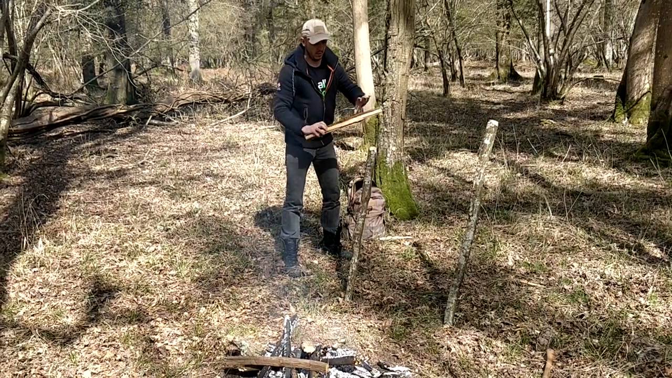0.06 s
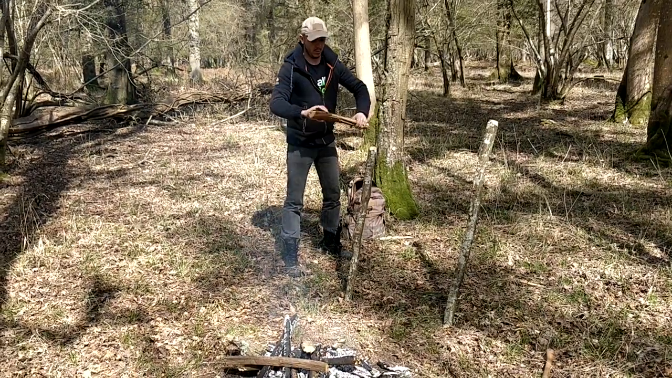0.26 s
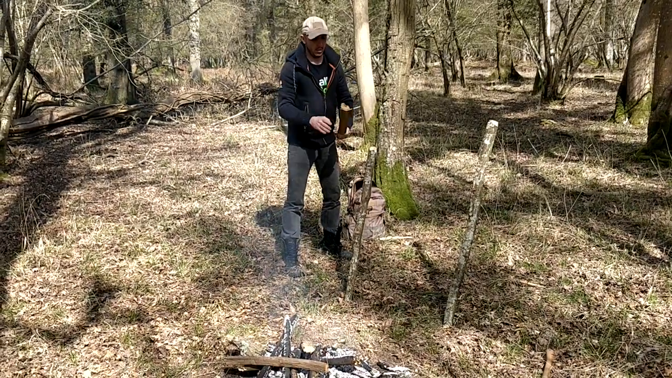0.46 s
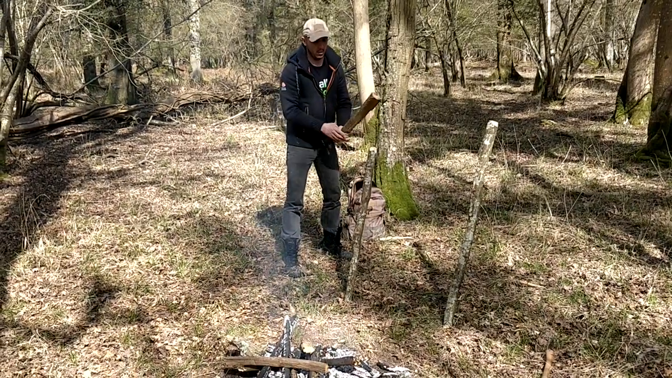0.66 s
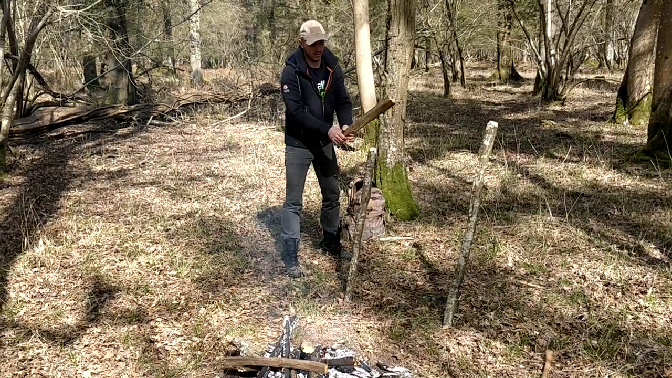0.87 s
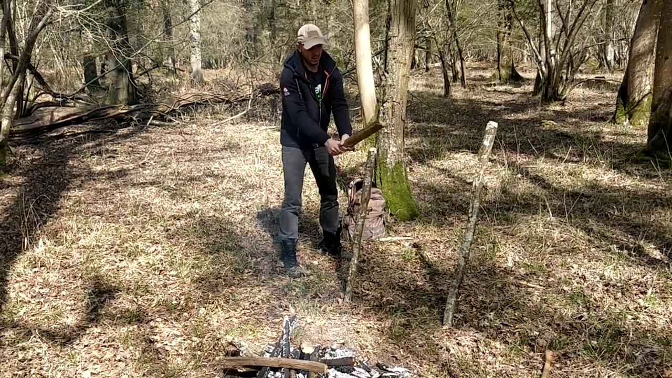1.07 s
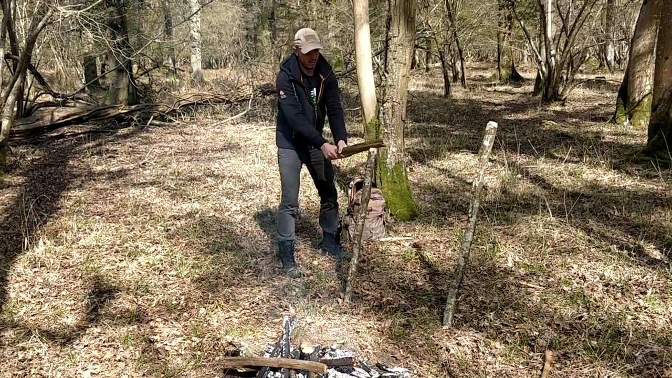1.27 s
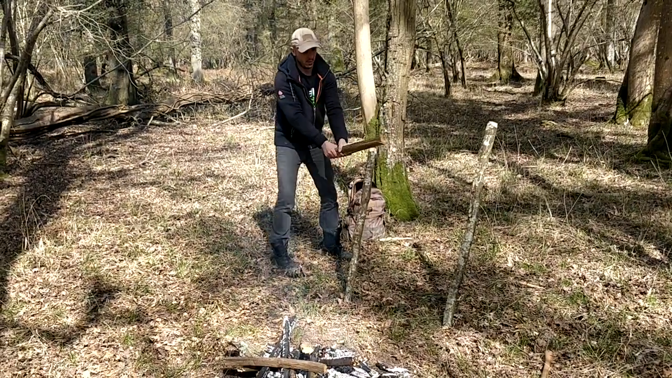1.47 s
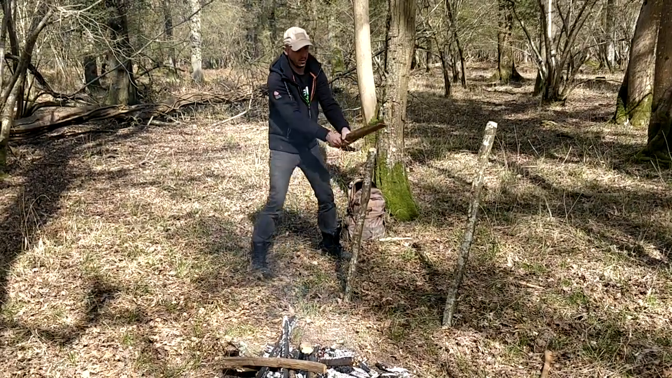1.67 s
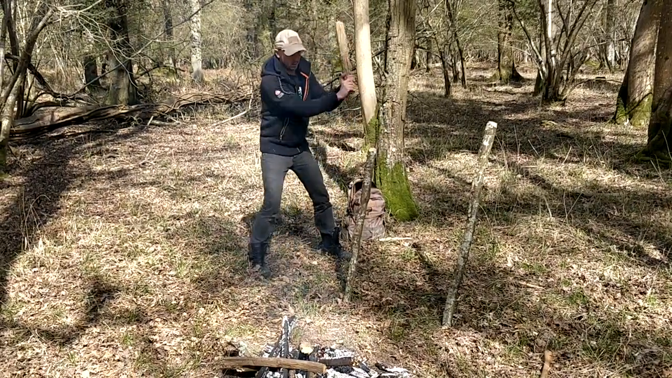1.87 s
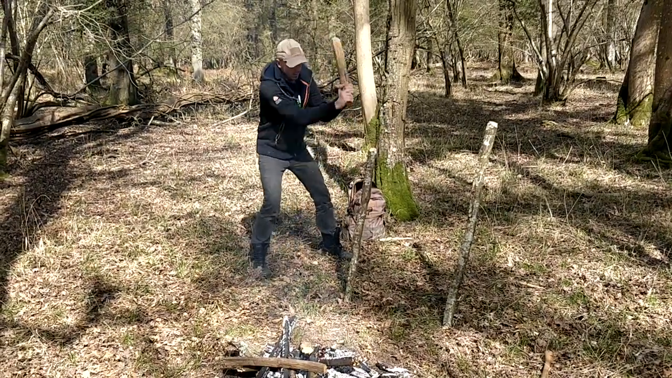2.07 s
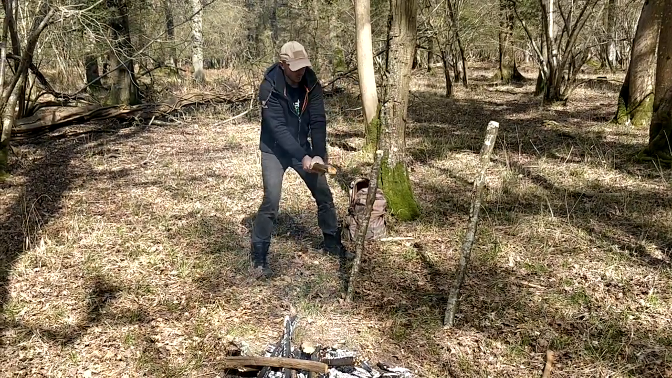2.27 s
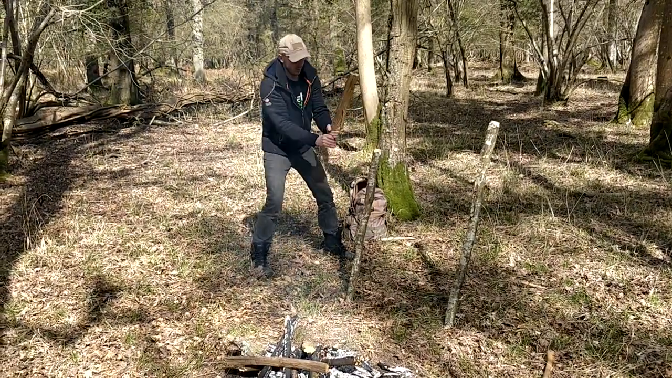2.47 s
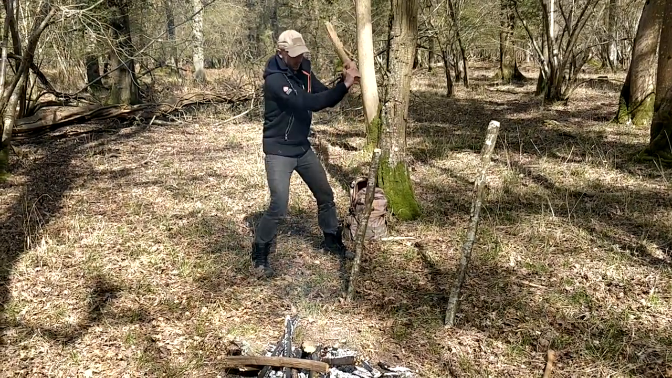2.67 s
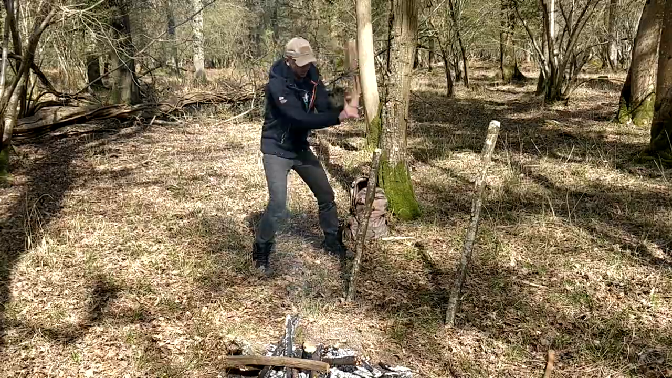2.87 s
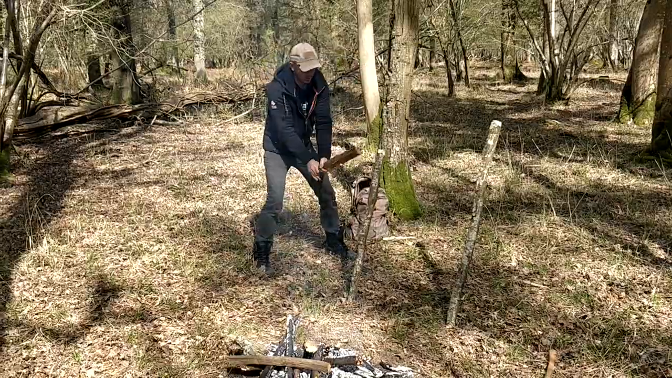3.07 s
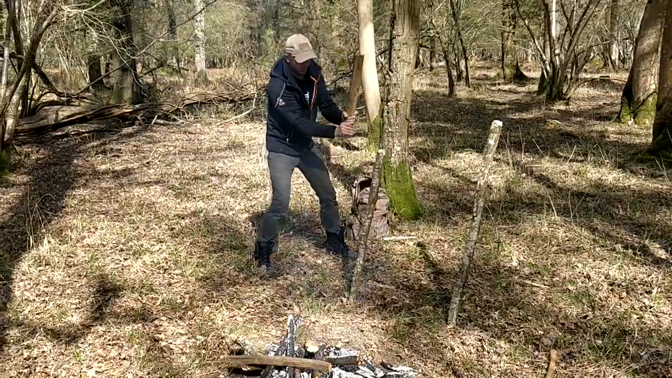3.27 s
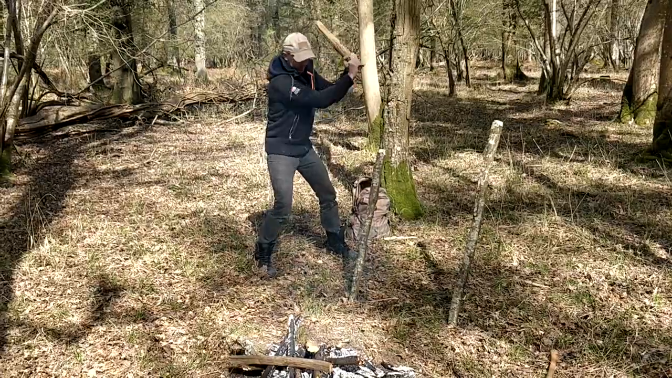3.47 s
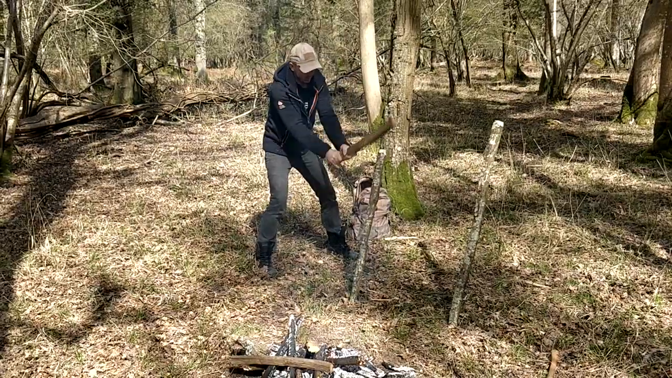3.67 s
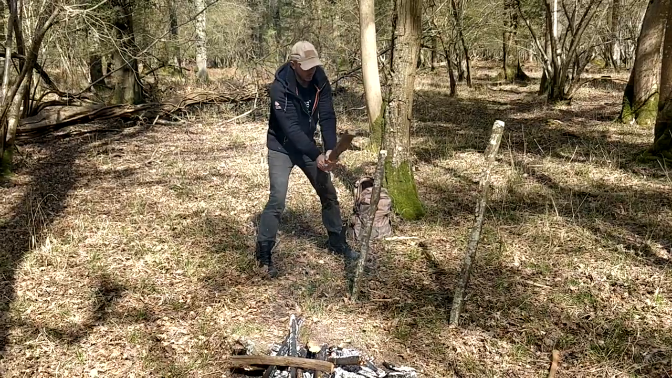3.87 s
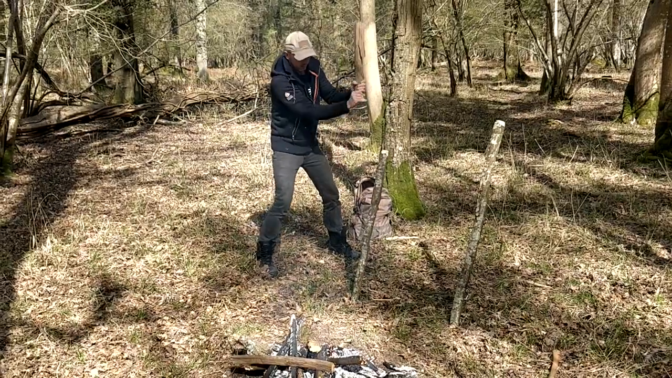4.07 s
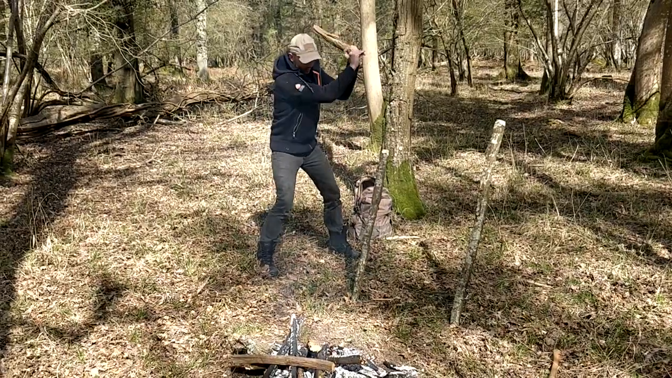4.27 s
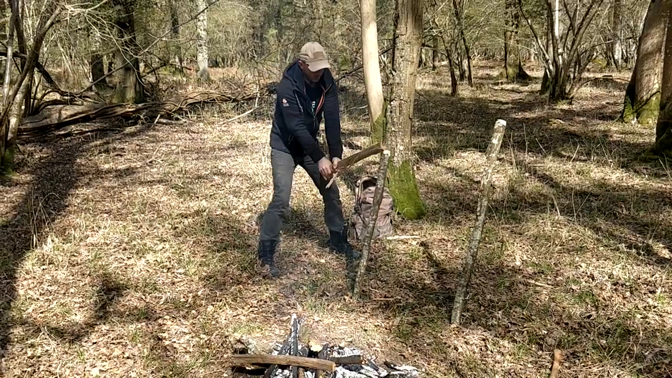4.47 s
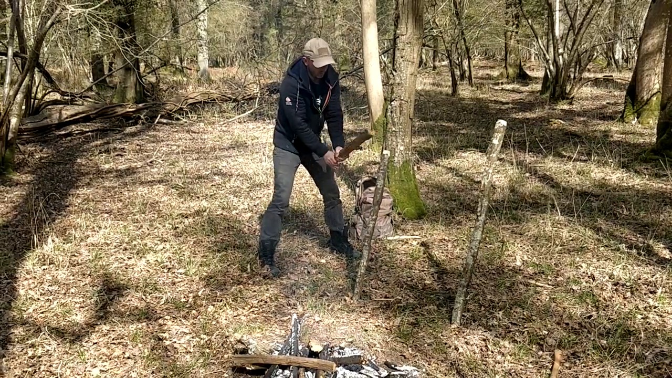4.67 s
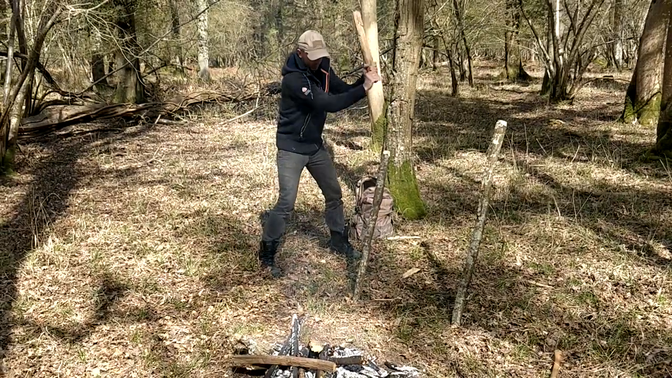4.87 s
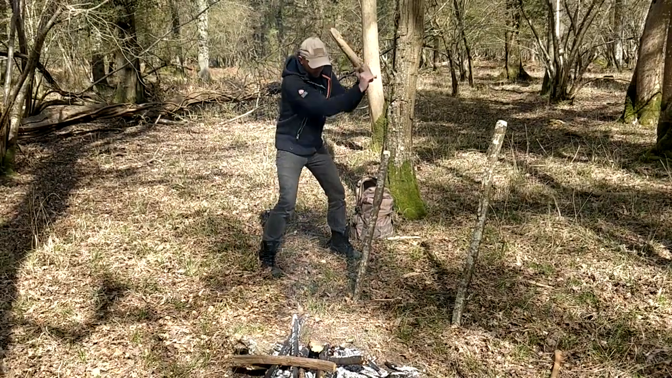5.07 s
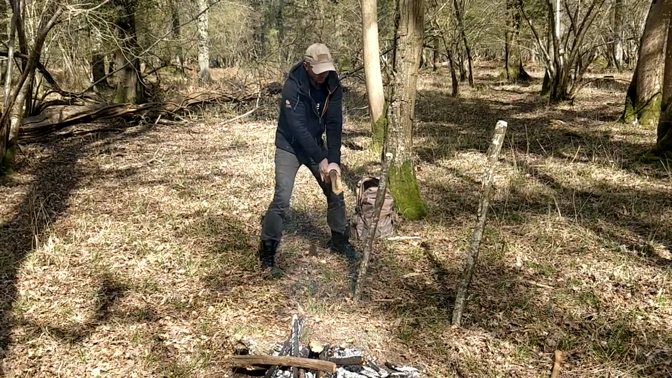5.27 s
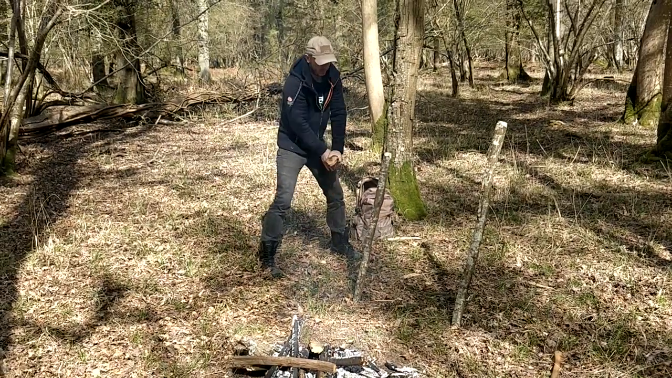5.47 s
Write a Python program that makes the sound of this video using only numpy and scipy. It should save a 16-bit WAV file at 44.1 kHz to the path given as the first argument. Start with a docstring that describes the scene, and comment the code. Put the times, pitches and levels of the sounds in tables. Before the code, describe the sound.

A wooden club drives a stake into woodland ground: one moderate knock, a faint tap, then five hard cracking blows with a short forest echo.

```python
"""Driving a stake in the woods

A wooden club drives a stake into a woodland floor: a trial blow, a light tap, then five full swings.
Each blow is a bank of damped wood modes, bursts of crackling noise and a low push from the soil.
Single trees echo it, and a second of decaying noise stands for the forest's wash.
Shaped noise makes leaves under boots, snapping twigs, breeze and far hush; sines make a chip's whir
and two far bird whistles."""
import sys
import numpy as np
from scipy import signal
from scipy.fft import rfft, irfft, next_fast_len
from scipy.io import wavfile
from scipy.ndimage import uniform_filter1d, minimum_filter1d, map_coordinates

SR = 44100
rng = np.random.default_rng(int(sys.argv[2]) if len(sys.argv) > 2 else 0)


def materialize(psi):
    """Save the field psi as 16-bit PCM at rate SR to the path in sys.argv[1].

    A 1-D psi becomes a single channel; in a 2-D psi each row is a channel.
    """
    bounded = np.clip(np.atleast_2d(psi).T, -1, 1)
    quanta = np.round(bounded * 32767).astype(np.int16)
    wavfile.write(sys.argv[1], SR, quanta)


N = 244049
TIME = np.arange(N) / SR


def amp(db):
    """Decibels to gain."""
    return 10 ** (np.asarray(db) / 20)


def unit(x):
    """Scales x to rms 1."""
    return x / np.sqrt(np.mean(x ** 2) + 1e-20)


def along(points, hz):
    """Reads a curve of (Hz, value) points on a log frequency axis."""
    f, v = np.transpose(points)
    return np.interp(np.log(hz + 1), np.log(f + 1), v)


def wobble(rate, size=N):
    """A smooth random curve with the given number of knots a second."""
    knots = rng.standard_normal(size // 8)
    return map_coordinates(knots, [np.arange(size) * rate / SR], mode="wrap")


def filtered(x, response):
    """Filters x by a response given as a function of frequency."""
    n = x.shape[-1]
    padded = next_fast_len(n + SR // 8)
    spectrum = rfft(x, padded) * response(np.fft.rfftfreq(padded, 1 / SR))
    return irfft(spectrum, padded)[..., :n]


def noise(spectrum, alike=None, size=N):
    """Stereo noise of rms 1: mid and side are balanced to set the left-right likeness by frequency."""
    def colour(hz):
        if alike:
            turn = np.arccos(np.clip(along(alike, hz), -1, 1)) / 2
        else:
            turn = np.full(len(hz), np.pi / 4)  # unrelated sides
        return amp(along(spectrum, hz)) * [np.cos(turn), np.sin(turn)]

    mid, side = filtered(rng.standard_normal((2, size)), colour)
    return unit(np.array([mid + side, mid - side]))


def grainy(x, spread_db):
    """Breaks a hiss into crackles of about a millisecond."""
    return unit(x * amp(spread_db * wobble(900, size=x.shape[-1])))


def add(track, s, x):
    """Mixes x into the track at time s."""
    at = round(s * SR)
    track[:, at:at + x.shape[1]] += x[:, :N - at]


# colour of the distant woodland hush: freq_hz, density_db (relative, per Hz)
HUSH_COLOUR = [(40, -11.5), (100, -18.5), (300, -27), (680, -26.5), (1100, -37), (2200, -42.5), (3700, -42),
               (5500, -48.5), (9000, -54.5), (13000, -53), (16000, -53.5)]
# how alike the hush is in both ears: freq_hz, likeness (-1 to 1)
HUSH_ALIKE = [(50, 0.89), (130, 0.42), (300, 0.95), (640, .3), (1400, -0.34), (3000, 0.3)]


def distant_hush():
    """Steady far woodland noise whose level drifts slowly."""
    return amp(-56.5 + 0.85 * wobble(2.3)) * noise(HUSH_COLOUR, HUSH_ALIKE)


# colour of the wind rumble: freq_hz, density_db (relative, per Hz)
BUFFET_COLOUR = [(12, 1), (30, -4.5), (55, -3), (110, -17), (250, -30.5), (550, -73.5)]
# puffs over the steady breeze: peak_s, level_db, half_length_s (fall by a factor e)
GUSTS = [(0.066, -38.5, 0.15), (0.53, -46.5, 0.28), (1.555, -51, 0.22), (5.17, -47, 0.16)]
BREEZE_DB = -56


def breeze():
    """Moving air buffets the microphone in low lumps, stronger in each puff."""
    rumble = noise(BUFFET_COLOUR, [(25, 0.11), (120, 1.0)])  # freq_hz, likeness
    lumps = unit(amp(2.4 * wobble(9)) * rumble)
    wind = amp(BREEZE_DB)
    for s, db, half in GUSTS:
        wind = wind + amp(db) * np.exp(-((TIME - s) / half) ** 2)
    return wind * lumps


# far bird whistles: peak_s, pitch_hz, level_db
WHISTLES = [(.095, 4000, -76), (.195, 3220, -70)]


def bird():
    """Two faint steady whistles, each a sine that swells and fades."""
    out = np.zeros(N)
    for s, hz, db in WHISTLES:
        swell = np.exp(-((TIME - s) / 0.026) ** 2)
        out += amp(db) * swell * np.sin(2 * np.pi * hz * TIME)
    return out


# colour of dry leaves: freq_hz, density_db (relative, per Hz)
LEAF_COLOUR = [(500, -25), (1200, -10), (2200, -13), (4000, -3), (6500, -5.5), (9000, -18.5), (11500, -2),
               (13800, 1), (16000, -10)]
# boots turning in the leaves: strongest_push_s, level_db
SHUFFLES = [(1.22, -57), (1.68, -42.5), (3.51, -57), (4.92, -58.5)]
SHUFFLE_RISE_S, SHUFFLE_FALL_S = .07, 0.073  # time to swell and to settle by a factor e
STIR_REST_DB, STIR_WORK_DB, WORK_START_S = -73.5, -66.5, 2  # leaves stir more as full swings start


def shuffling():
    """Dry leaves stir faintly all along, and swell and settle each time a boot turns."""
    stir = amp(np.where(TIME < WORK_START_S, STIR_REST_DB, STIR_WORK_DB))
    turns = np.zeros(N)
    for s, db in SHUFFLES:
        distance = np.maximum((s - TIME) / SHUFFLE_RISE_S, (TIME - s) / SHUFFLE_FALL_S)
        turns += amp(db) * np.exp(-distance)
    rustle = grainy(noise(LEAF_COLOUR), spread_db=2.0)
    return np.hypot(stir, turns) * amp(1.1 * wobble(34)) * rustle


# short scrunches of leaf litter and clothing: start_s, level_db, length_s, crisp_top_db (relative)
SCRUNCHES = [(0.291, -56, 0.057, 1), (0.376, -57, 0.03, 8.5), (.599, -52.5, 0.013, -1),
             (2.484, -40, 0.049, 6.5), (3.2, -46, 0.033, -4), (4.005, -40.5, .018, 14),
             (4.348, -48.5, 0.048, -0.5), (4.697, -48.5, .033, 2.5), (4.782, -42, 0.047, 5.5),
             (5.304, -42.5, 0.026, 2)]
# dry twigs snapping: start_s, level_db
SNAPS = [(.9735, -51), (.984, -53), (1.938, -50), (2.489, -35), (3.211, -33), (4.004, -38), (4.804, -39)]
# colour of twigs, and of a crisp top shared with the blows: freq_hz, density_db (relative, per Hz)
TWIG_COLOUR = [(500, -17), (1500, -9), (3000, 1.5), (5000, 4.5), (7000, -9.5), (9000, -26.5), (12000, -19)]
SPLINTER_COLOUR = [(3000, -44.5), (6000, -9), (7500, -8), (9000, -19.5), (10500, -7), (12500, 0),
                   (15500, -6), (17000, -5)]
SNAP_T60_S = .016  # time for a snap to die away by 60 dB
TICKS_PER_S, TICK_DB = 2.5, -59.5  # fainter ticks of falling bark, at random


def litter():
    """Crushed leaves crackle in short swells; twigs and bark tick as quickly damped noise."""
    out = np.zeros((2, N))
    t = np.arange(SR // 3) / SR
    for s, db, length, crisp_db in SCRUNCHES:
        u = 3 * t / length  # the swell peaks a third of the way through
        crush = noise(TWIG_COLOUR, size=len(t)) + amp(crisp_db) * noise(SPLINTER_COLOUR, size=len(t))
        add(out, s - .003, amp(db) * u * np.exp(1 - u) * grainy(crush, spread_db=4.5))
    ticks = [(rng.uniform(0, N / SR), TICK_DB) for _ in range(round(TICKS_PER_S * N / SR))]
    for s, db in SNAPS + ticks:
        tick = noise(TWIG_COLOUR, size=len(t)) + 0.75 * noise(SPLINTER_COLOUR, size=len(t))
        add(out, s, amp(db) * tick * amp(-60 * t / SNAP_T60_S))
    return out


CHIP_START_S, CHIP_LAND_S, CHIP_FADE_S = 2.23, 2.505, .025  # flight of a splinter off the stake
CHIP_HZ, CHIP_SLOWS_PER_S, CHIP_DB = 181, 0.71, -54  # its whir falls as the air brakes it


def chip():
    """A spinning splinter whirs as a sine, slowing until it lands."""
    hz = CHIP_HZ * np.exp(-CHIP_SLOWS_PER_S * np.maximum(TIME - CHIP_START_S, 0))
    flying = np.clip(np.minimum(TIME - CHIP_START_S, CHIP_LAND_S - TIME) / CHIP_FADE_S, 0, 1)
    return amp(CHIP_DB) * flying * np.sin(2 * np.pi * np.cumsum(hz) / SR)


# colour of the forest's answer: freq_hz, density_db (relative, per Hz)
WOODS_COLOUR = [(60, -7.5), (200, 3), (330, -3), (500, 3.5), (760, 6.5), (1100, 1), (1500, -0.5),
                (2200, -3.5), (3500, -3.5), (5200, -1.5), (6500, -7.5), (9000, -23), (12500, -6.5),
                (16000, -8.5)]
# how alike the answer is in both ears: freq_hz, likeness (-1 to 1)
WOODS_ALIKE = [(130, 1), (300, 0.85), (640, 0.58), (1400, -0.36), (3000, -0.14)]
# how long the answer takes to fall by 60 dB: freq_hz, t60_s
WOODS_T60 = [(100, 0.75), (300, 1.2), (700, 1.37), (1500, 1.485), (4000, 0.95), (7000, 0.55), (13000, 0.49)]


def woods(db, edge_hz, clack_hz, clack_db, bite_hz, bite_db):
    """Countless far trunks merge a blow into an untuned wash; its mids linger longest."""
    hz, t, z = signal.stft(noise(WOODS_COLOUR, WOODS_ALIKE, size=SR), SR, nperseg=256)
    hz = hz[:, None]

    def around(centre, octaves):
        return np.exp(-(np.log2((hz + 1) / centre) / octaves) ** 2)

    # the wash keeps a broad trace of the blow's clack and bite
    clack = amp(0.36 * clack_db * around(clack_hz, 0.93))
    bite = 1 + amp(bite_db) * around(bite_hz, 0.19)
    colour = clack * bite / np.hypot(1, hz / edge_hz)
    bloom_db = 2.0 * around(780, 1) * np.exp(-((t - .11) / 0.032) ** 2)  # denser trees answer late
    decay = amp(bloom_db - 60 * t / along(WOODS_T60, hz))
    tail = signal.istft(z * colour * decay, SR, nperseg=256)[1][:, :SR]
    scatter = amp(wobble(250, size=SR))
    onset = 1 - np.exp(-np.arange(SR) / SR / 0.0092)
    return amp(db + 1.5) * tail * scatter * onset


# modes of stake and club together: pitch_hz, level_db (relative), t60_s, left_minus_right_db
WOOD_MODES = [(210.2, -21, 0.049, -4.5), (487, -9, 0.02, 0), (516.2, 1, 0.024, 0), (621, -13.5, 0.047, 1.5),
              (784, -5.5, 0.031, -3.5), (1035, -8, 0.025, 6), (1114, -11, .032, -3),
              (1154, -11, 0.023, -6.5), (1521, -7.5, .024, 5.5), (1818, -5.5, 0.015, 8.5),
              (2218, -15, 0.028, 3), (2430, -20, .04, 2), (2890, -16.5, 0.028, -5), (3404, -15.5, .032, -1),
              (3660, -23, 0.024, -2.5), (4498, -11.5, 0.025, -4), (5220, -23, 0.035, 1)]
# colour of the crack: freq_hz, density_db (relative, per Hz)
CRACK_COLOUR = [(200, -42.5), (330, -27), (470, 6), (1100, 3.5), (2000, -0.5), (3500, 1), (5000, -4.5),
                (6200, -10), (7500, -14.5), (9000, -28), (11000, -39)]
# how alike crack and bite are in both ears: freq_hz, likeness (-1 to 1)
BLOW_ALIKE = [(300, 0.59), (1000, 0.74), (2500, 0.66), (4500, 0.35), (7000, -0.71)]


def blow(ring_db, thump_db, crack_db, top_db, knock_hz, knock_db, clack_hz, clack_db, bite_hz, bite_db):
    """Club meets stake: the landing spot favours certain modes, fibres crack and the soil is pushed."""
    t = np.arange(SR // 6) / SR
    ears = np.array([[.5], [-.5]])

    def fade(t60):
        return amp(-60 * t / t60)

    def near(hz, centre):
        return np.exp(-(np.log2(hz / centre) / 0.54) ** 2)

    wood = np.zeros((2, len(t)))
    for hz, db, t60, pan_db in WOOD_MODES:
        lift_db = knock_db * near(hz, knock_hz) + clack_db * near(hz, clack_hz) + rng.normal(0, .5)
        # phase in radians: the left tends to lead, more loosely at high pitch
        lead = ears * (0.45 + rng.normal(0, 1.0) * min(hz / 1500, 1.5))
        mode_hz = hz * (1 + rng.normal(0, 0.0067))
        # modes fall roughly into step when the club has sunk deepest, about 2 ms after it touches
        swing = np.sin(2 * np.pi * mode_hz * (t - .0022) + lead)
        wood += amp(ring_db + db + lift_db + ears * pan_db) * fade(t60) * swing
    wood *= 1 - np.exp(-t / 0.00037)
    # noise stands for a cluster of close, heavily damped modes
    cluster = [(bite_hz / 2, -40), (bite_hz * 0.69, -14), (bite_hz, 0), (bite_hz * 1.2, -14),
               (bite_hz * 2, -40)]
    bite = amp(bite_db) * noise(cluster, BLOW_ALIKE, size=len(t)) * fade(0.027)
    # crushed fibres crack, then splinter on a little longer
    crack_fade = fade(0.0089) + .8 * fade(0.022) + amp(-14.0) * fade(.13)
    crack = amp(crack_db) * noise(CRACK_COLOUR, BLOW_ALIKE, size=len(t)) * crack_fade
    splinter_fade = fade(0.032) + amp(-13.5) * fade(.18)
    splinter = amp(top_db) * noise(SPLINTER_COLOUR, size=len(t)) * splinter_fade

    def push(u):
        return u * (u / 2 - 1) * np.exp(-u)

    # the soil is pushed as the stake sinks and again as it stops
    sinking = 5.0 * push(t / 0.00092)
    stopping = 0.84 * push(np.maximum(t - .017, 0) / 0.0021)
    thump = amp(thump_db) * (sinking + stopping)
    return (1 - np.exp(-t / 0.00031)) * (wood + bite + crack + splinter) + thump


# blows, with the three regions of ring that the landing spot brings out:
# start_s, force_db, knock_hz, knock_lift_db, clack_hz, clack_lift_db, bite_hz, bite_level_db
BLOWS = [(1.1968, -11, 1120, 0, 1650, 17, 2900, -15), (1.5665, -28, 620, 7.5, 2900, -26, 1090, -36),
         (2.2066, -2, 1150, 2, 1700, 3, 4250, -24), (2.9898, -3.5, 1100, 2, 1780, 10, 4600, -19),
         (3.7351, 0, 1050, 2.5, 1650, -2, 3740, -17.5), (4.482, 0.5, 850, 3, 1850, 9.5, 4450, -33),
         (5.221, 0.5, 700, 0, 1400, -11.5, 3040, -7.5)]
# echoes off single trees: delay_s, level_db
TRUNKS = [(.011, -26.5), (0.0307, -29.5), (0.0564, -31), (.106, -31)]
# how each part's drive grows with force: drive_db at 0 dB force, growth_db per dB of force
RING_LAW = (-4.5, 0.99)
THUMP_LAW = (-12.5, 0.8)
CRACK_LAW = (-10, 1.1)
SPLINTER_LAW = (-19.5, 1.75)
ANSWER_LAW = (-36, 0.73)
# a harder blow gets a brighter answer: treble edge in Hz, and its growth in dB per dB of force
EDGE_SOFT_HZ, EDGE_GAIN_HZ, EDGE_GROWS = 1200, 7800, 2.3


def hammering():
    """All blows, with dull single echoes off the near trunks and the wash from further away."""
    out = np.zeros((2, N))
    laws = (RING_LAW, THUMP_LAW, CRACK_LAW, SPLINTER_LAW, ANSWER_LAW)
    for s, force_db, knock_hz, knock_db, *upper in BLOWS:  # upper: clack and bite
        *part_dbs, answer_db = (full_db + grows * force_db for full_db, grows in laws)
        hit = blow(*part_dbs, knock_hz, knock_db, *upper)
        add(out, s, hit)
        off_bark = filtered(hit, lambda hz: 1 / (1 + 1j * hz / 1200))
        for delay, db in TRUNKS:
            add(out, s + delay, amp(db) * off_bark)
        edge_hz = EDGE_SOFT_HZ + EDGE_GAIN_HZ * amp(EDGE_GROWS * force_db)
        add(out, s, woods(answer_db, edge_hz, *upper))
    return out


# stereo tilt of the work between the two microphone ports: freq_hz, left_minus_right_db
PORT_TILT = [(100, -1), (400, -0.5), (600, 2), (1700, 0.5), (3000, 2.5), (4500, -5.5), (6000, -1),
             (8500, 16.5), (13000, 14)]


def scene():
    """The work leans by frequency, its highest treble far to the left; bird and air stay as made."""
    work = hammering() + shuffling() + litter() + chip()

    def tilt(hz):
        left_share = 1 / (1 + amp(-along(PORT_TILT, hz)))
        return 2 * np.array([left_share, 1 - left_share])

    return filtered(work, tilt) + bird() + distant_hush() + breeze()


TOP_HZ = 15950  # band limit


def record(dry):
    """A fast limiter holds the blows below full scale, then a steep low-pass sets the band limit."""
    needed = np.minimum(1, .88 / (np.abs(dry).max(axis=0) + 1e-9))
    gain = uniform_filter1d(minimum_filter1d(needed, size=89), size=67)  # windows in samples
    return filtered(dry * gain, lambda hz: 1 / (1 + (hz / TOP_HZ) ** 120))


dry = scene()
out = record(dry)
materialize(out)
```